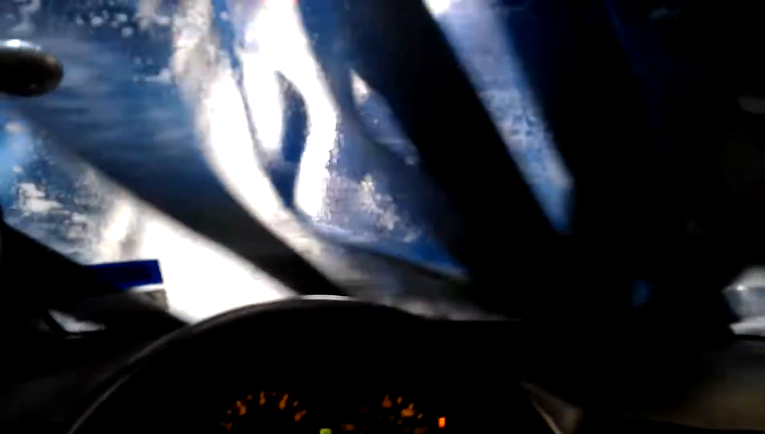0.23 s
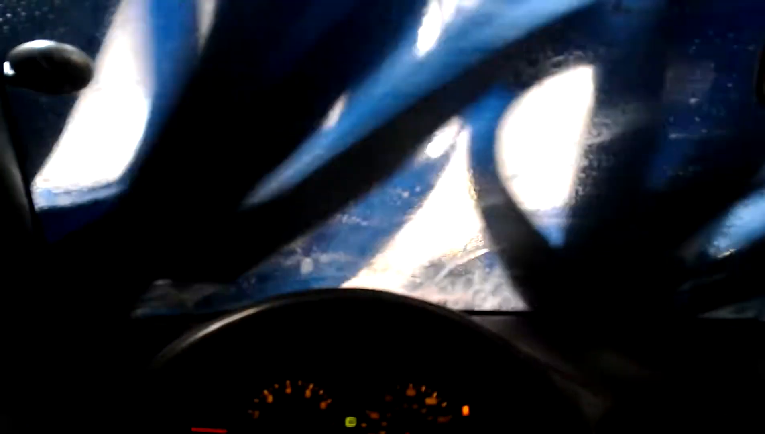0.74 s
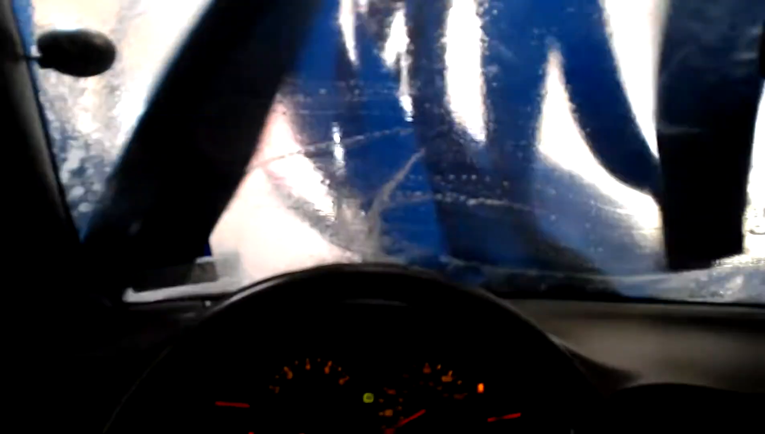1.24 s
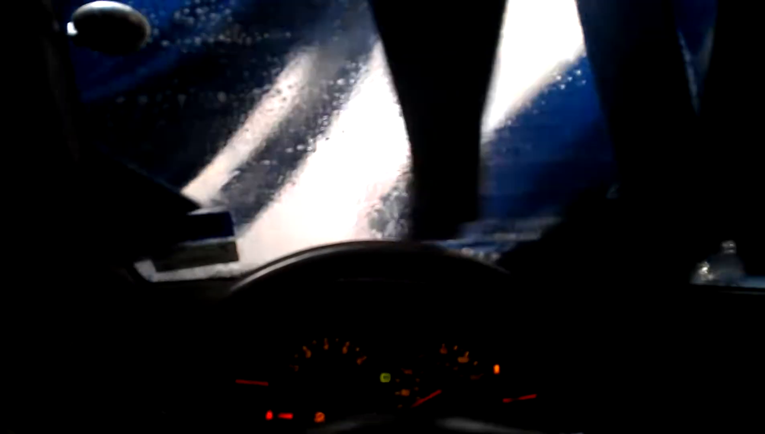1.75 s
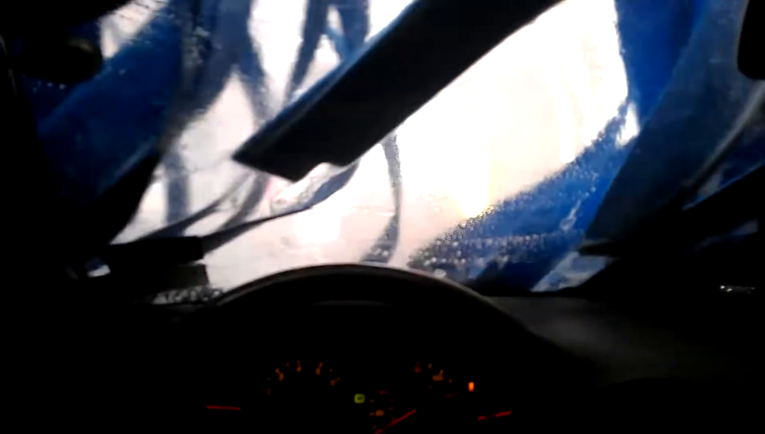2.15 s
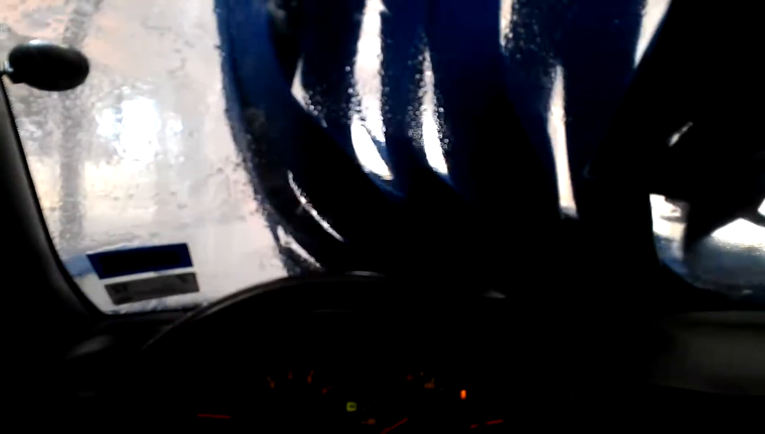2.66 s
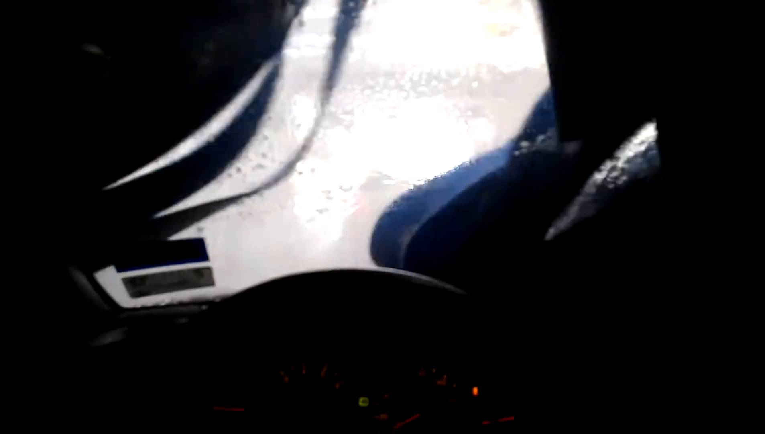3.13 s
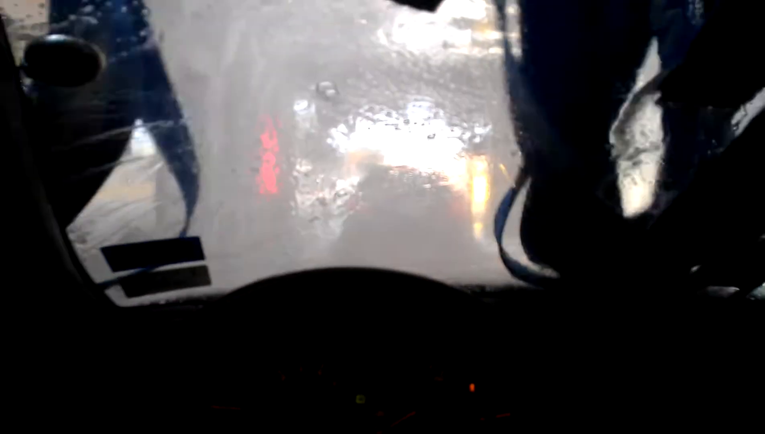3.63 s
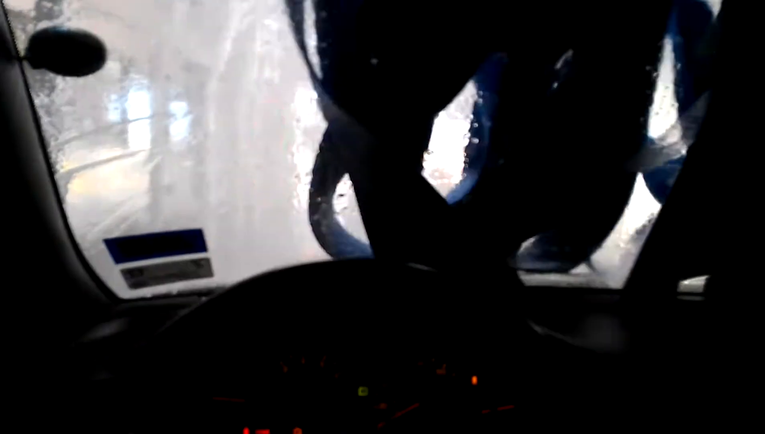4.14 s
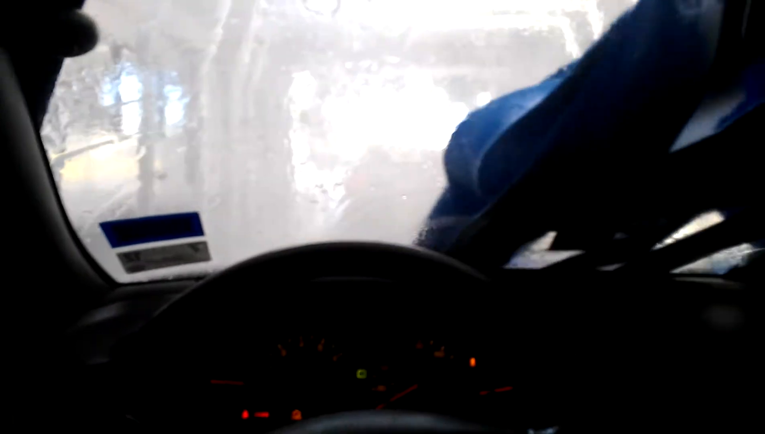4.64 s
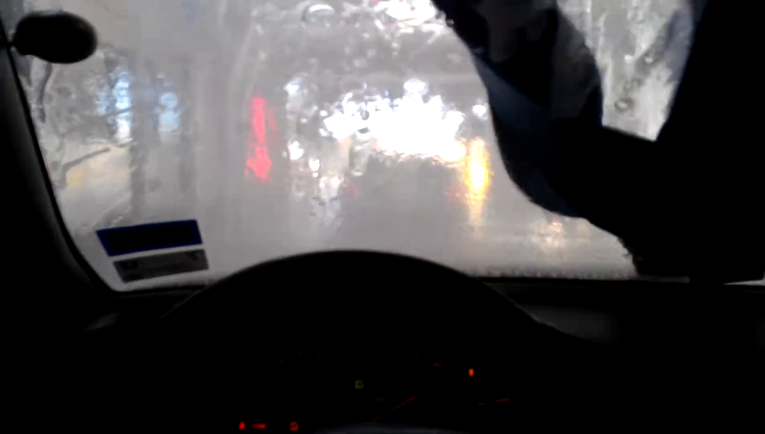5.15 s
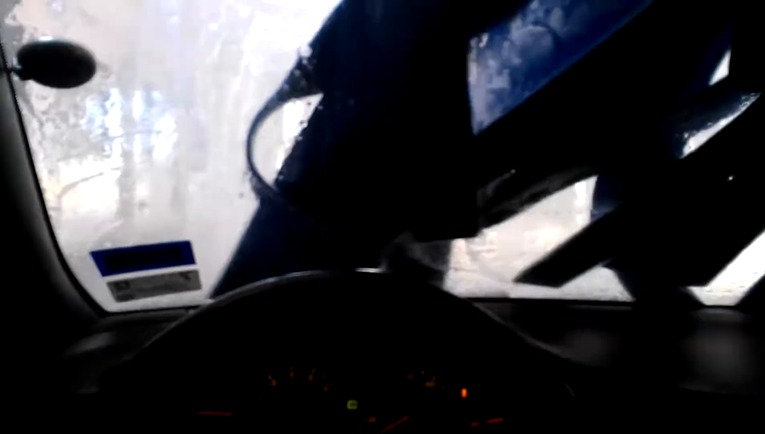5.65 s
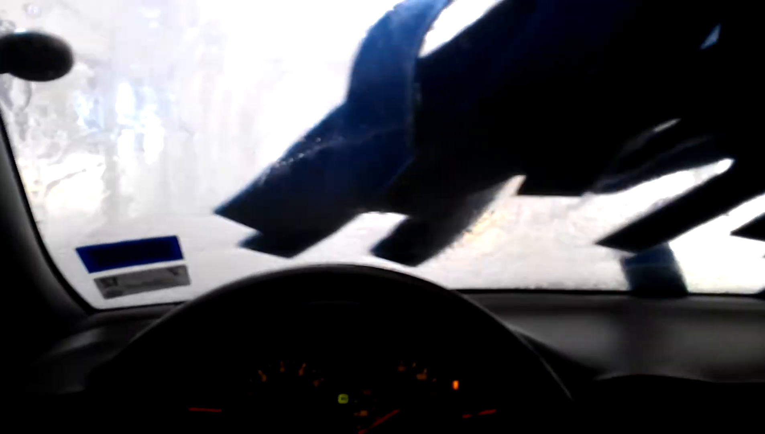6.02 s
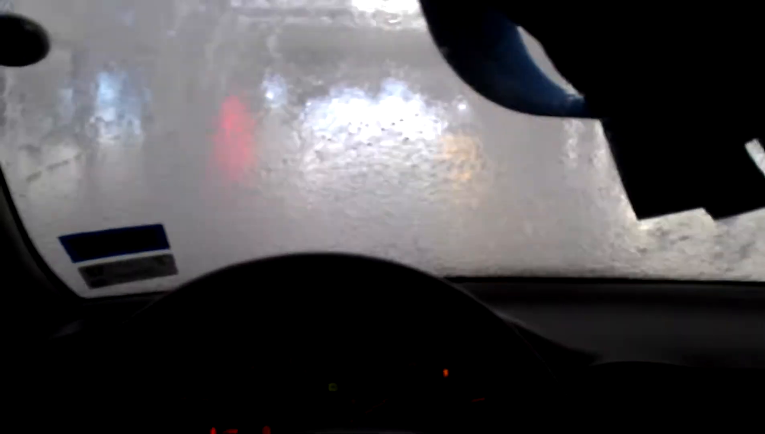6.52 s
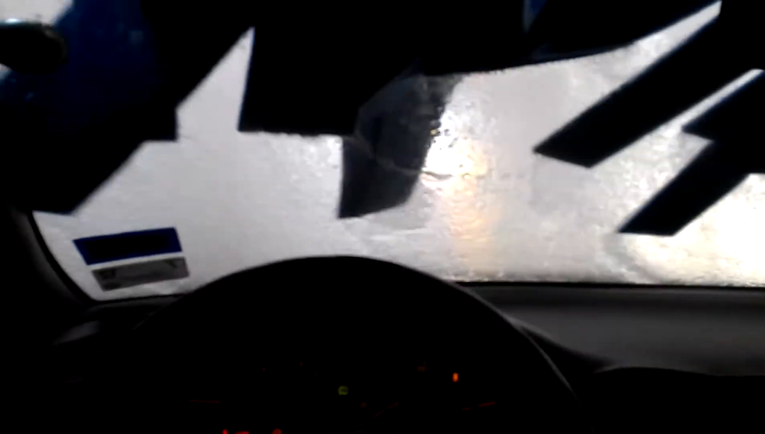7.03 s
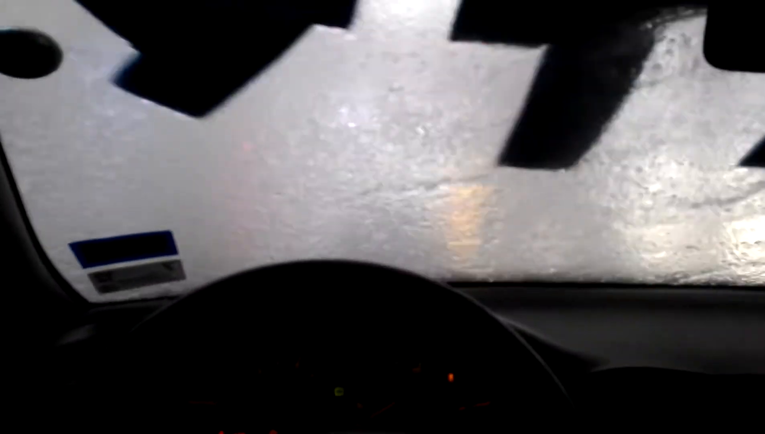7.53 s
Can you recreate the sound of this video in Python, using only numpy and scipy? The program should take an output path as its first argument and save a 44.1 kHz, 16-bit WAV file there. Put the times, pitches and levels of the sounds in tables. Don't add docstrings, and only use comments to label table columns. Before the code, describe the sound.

Inside a closed car in a tunnel wash, wet cloth drags over the panels from the start with a grainy mid-toned rub, a faint drive hum, swishing water and bright spray hiss; a thin nozzle hiss fades by about 3 s. Moderate slaps hit the glass and roof at 0.1, 0.6, 0.9 and 1.2-1.4 s. The hardest cluster lands at 1.8-2.1 s, with a sharp door whack, glass slap and deep roof thump, all splashing. Another heavy thud comes at 2.7 s, then a dull run at 3.1-3.3 s and a strong wet glass slap at 4 s. Uneven medium knocks and scrubbing continue through 4.3-5.7 s. A deep roof boom with a glass hit strikes at 6.2 s as spray grows stronger, followed by wet slaps at 6.7-7.0 and 7.4-7.7 s. Hard hits distort on the small stereo microphone, and the wash briefly ducks after them.

```python
import sys
import numpy as np
from scipy import signal
from scipy.fft import rfft, irfft, next_fast_len
from scipy.io import wavfile
from scipy.ndimage import uniform_filter1d, map_coordinates

SR = 44100
rng = np.random.default_rng(int(sys.argv[2]) if len(sys.argv) > 2 else 0)


def put_to_file(sound):
    columns = np.atleast_2d(sound).T
    safe = np.clip(columns, -1, 1)
    whole_steps = np.round(safe * 32767)
    wavfile.write(sys.argv[1], SR, whole_steps.astype(np.int16))


def makeup_ratio(level_db):
    decades = np.asarray(level_db, float) / 20
    return 10 ** decades


N = 343098


def unit(x):
    return x / np.sqrt(np.mean(x ** 2) + 1e-20)


def along(points, hz):
    f, v = np.transpose(points)
    return np.interp(np.log(hz + 1), np.log(f + 1), v)


def wobble(rate):
    knots = rng.standard_normal(int(N * rate / SR) + 4)
    return map_coordinates(knots, [np.arange(N) * rate / SR])


def filtered(x, response):
    m = next_fast_len(x.shape[-1] + 4096)
    spectrum = rfft(x, m) * response(np.fft.rfftfreq(m, 1 / SR))
    return irfft(spectrum, m)[..., :x.shape[-1]]


def resonance(f, hz, width_hz):
    return 1j * f * width_hz / (hz * hz - f * f + 1j * f * width_hz)


def hum(hz, width_hz):
    return unit(filtered(rng.standard_normal((2, N)), lambda f: resonance(f, hz, width_hz) ** 2))


def rush(spectrum, patchy_db, grain_db):
    z = signal.stft(rng.standard_normal((2, N)), nperseg=512)[2]

    def field(bins, frames):
        noise = rng.standard_normal(z.shape[1:])
        return unit(uniform_filter1d(uniform_filter1d(noise, size=bins, axis=0), size=frames, axis=1))

    aimed = 0.6
    z[1] = aimed * z[0] * np.exp(2j * field(12, 60)) + np.sqrt(1 - aimed ** 2) * z[1]
    pair = signal.istft(z * makeup_ratio(patchy_db * field(6, 8)), nperseg=512)[1][:, :N]
    return unit(filtered(pair * makeup_ratio(grain_db * wobble(250)), lambda hz: makeup_ratio(along(spectrum, hz))))


def lead_in():
    lift_s, rise_s = 0.0083, 0.075
    force = np.zeros(N)
    for s, db, *_ in blows():
        force[round((s - lift_s) * SR)] += makeup_ratio(0.67 * db - 11.5)
    rise = np.exp(-np.arange(SR // 2)[::-1] / SR / rise_s)
    return 20 * np.log10(1 + np.abs(signal.fftconvolve(force, rise)[SR // 2 - 1:][:N]))


def wash():
    # (time [s], drag level [dB], water level [dB])
    wash_moves = [(0.0, -23, -26), (0.84, -20.5, -30.5), (1.82, -22, -35), (2.01, -21, -37),
                  (2.47, -22, -37.5), (2.77, -19.5, -39.5), (3.05, -22.5, -36.5), (3.34, -20, -40),
                  (3.7, -22, -39), (4.16, -19.5, -36), (4.87, -20, -35), (5.74, -23, -34),
                  (6.09, -21, -27.5), (6.39, -19.5, -25.5), (6.72, -23, -26.5), (7.13, -21, -28),
                  (7.48, -23, -24.5), (7.78, -23, -23)]
    # (time [s], level [dB] on the swish)
    sheet_moves = [
        (0, 0),
        (1.3, -2),
        (2.2, 2),
        (4.6, 2.5),
        (5.8, 4),
        (7.78, 1.5),
    ]
    # (time [s], level [dB] against the swish)
    nozzle_moves = [
        (0, -9),
        (.65, -9),
        (1.3, -14),
        (3, -27),
    ]
    # (centre [Hz], width [Hz], level [dB] against the scrub)
    drive_hums = [
        (373, 62, -10),
        (525, 21.6, -9.5),
    ]
    # (frequency [Hz], level [dB per Hz])
    scrub_colour = [(50, -103), (100, -55.5), (257, -5), (360, 0), (524, 0), (614, -2.5), (772, 0),
                    (1040, -2.5), (1450, -23.5), (1800, -13), (2340, -36), (3960, -120)]
    # (frequency [Hz], level [dB per Hz])
    swish_colour = [(710, -37.5), (1200, -2.5), (1320, -4.5), (1760, -3.5), (2180, -1.5), (2370, -2.5),
                    (2920, -7), (3320, -7), (3850, -5.5), (5200, -16.5), (6760, -24.5), (11400, -120)]
    # (frequency [Hz], level [dB per Hz])
    spray_colour = [(2350, -65), (4000, 0.5), (5150, -4), (6130, -1.5), (7540, -5), (8950, -1.5),
                    (9360, -5), (10600, -18), (13700, -59), (22000, -120)]

    t = np.arange(N) / SR
    s, *levels = np.transpose(wash_moves)
    drag_db, water_db = [np.interp(t, s, level) for level in levels]
    sheet_db = np.interp(t, *np.transpose(sheet_moves))
    near_db = lead_in()

    swish_wet, spray_drag, lead_in_wet = 0.53, 0.06, 0.4
    scrub_db = 2.5 + drag_db + near_db
    swish_db = 5 + sheet_db + (1 - swish_wet) * drag_db + swish_wet * water_db + lead_in_wet * near_db
    spray_db = 5 + spray_drag * drag_db + water_db + lead_in_wet / 2 * near_db

    drag = wobble(22)
    drone = sum(makeup_ratio(db) * hum(hz, width_hz) for hz, width_hz, db in drive_hums)
    whistle_db = np.interp(t, *np.transpose(nozzle_moves)) + 4.3 * wobble(14)
    whistle = makeup_ratio(whistle_db) * hum(3830, 420)
    scrub = makeup_ratio(scrub_db + 1.3 * drag + 1.2 * wobble(45)) * (rush(scrub_colour, 1.2, 1.5) + drone)
    swish = makeup_ratio(swish_db + 0.28 * drag) * (rush(swish_colour, patchy_db=1.5, grain_db=0.7) + whistle)
    spray = makeup_ratio(spray_db + 1.35 * drag) * rush(spray_colour, patchy_db=1.4, grain_db=0.4)
    return scrub + swish + spray


def aimed_noise(count, size):
    shake = rng.standard_normal((count, 2, size))
    share = 0.7
    late = np.roll(shake[:, 0], rng.integers(-40, 40), axis=1)
    shake[:, 1] = share * late + np.sqrt(1 - share ** 2) * shake[:, 1]
    return shake


def contact(t, length, rise, fall):
    length = np.clip(length, .003, .08)
    release = np.exp(np.minimum((t - length) / (fall * length + 0.0011), 50))
    return (1 - np.exp(-t / rise)) / (1 + release)


def add(track, s, sound):
    start = round(s * SR)
    track[:, start:start + sound.shape[1]] += sound


def splats():
    # (time [s], peak level [dB], centre [Hz], fizz level [dB])
    big_splats = [(0.464, -7.5, 1340, -11), (.633, -7, 1270, -8), (.735, -8, 1660, -21),
                  (1.158, -14, 3860, -21), (1.782, -11, 1540, -12), (1.8088, -4.5, 1210, -17),
                  (1.8334, 5.5, 1570, -17), (1.982, -2.5, 1320, -12), (2.024, -2, 1210, -15),
                  (2.174, -11, 1320, -16), (2.4668, -13.5, 1230, -10), (2.6664, 4.5, 1800, -26),
                  (3.047, -5, 1810, -14), (3.2003, 2, 2100, -8), (3.2605, -3, 1320, -35),
                  (3.497, -7.5, 1320, -17), (3.72, -15, 2200, -17), (3.813, -11, 1700, -11),
                  (3.9818, 4, 1360, -22), (4.2684, -6, 1730, -17), (4.365, -10, 2300, -14),
                  (4.5407, -7.5, 1470, -7), (5.042, -7, 1290, -14), (5.55, -1, 1940, -28),
                  (5.695, -4, 1810, -15), (5.967, -12.5, 1310, -5), (6.22, -9, 1220, -18),
                  (6.953, -6.5, 1370, -15), (7.0284, -2, 1880, -15), (7.6987, -6.5, 2520, -2)]
    # (time [s], peak level [dB], centre [Hz])
    small_flicks = [(.578, -12.5, 1240), (1.224, -16, 1520), (1.368, -28, 1330), (1.75, -12, 1890),
                    (1.794, -17, 2300), (1.946, -6.5, 1400), (2.96, -22, 1400), (3.74, -15, 3070),
                    (3.8989, -10.5, 2620), (4.77, -14.5, 2510), (5.012, -11, 2050), (5.756, -11, 1830),
                    (6.327, -6, 2400), (6.384, -5, 1870), (6.62, -11, 2530), (6.682, -16, 1910),
                    (6.917, -8.5, 1400), (7.435, -14, 2190)]
    # (frequency [Hz], level [dB per Hz])
    wet_colour = [(900, -13), (1400, -7.5), (2000, -3), (3000, -5), (4500, -5), (7000, -42)]
    # (frequency [Hz], level [dB per Hz])
    fizz_colour = [(3000, -49), (4500, 0.5), (7000, -2.5), (9000, -1.5), (12000, -36), (16000, -41)]

    flick_fizz_db = -10
    track, t = np.zeros((2, N + SR)), np.arange(SR // 6) / SR
    for s, db, hz, fizz_db in [*big_splats, *[(*row, flick_fizz_db) for row in small_flicks]]:
        shake = aimed_noise(count=2, size=len(t))
        drops = makeup_ratio(3 * unit(uniform_filter1d(rng.standard_normal(len(t)), size=110)))
        body = unit(filtered(drops * shake[0],
                             lambda f: makeup_ratio(along(wet_colour, f)) * resonance(f, hz, 0.32 * hz)))
        fizz = unit(filtered(drops * shake[1], lambda f: makeup_ratio(along(fizz_colour, f))))
        burst = contact(t, 0.016, 0.00037, 0.35)
        trickle = makeup_ratio(-9 - 60 * t / 0.18) * (1 - np.exp(-t / 0.002))
        add(track, s, makeup_ratio(db - 4.5) * ((burst + trickle) * body + makeup_ratio(fizz_db) * burst * fizz))
    return track[:, :N]


def blows():
    # (time [s], peak level [dB], contact [ms])
    boom_blows = [
        (3.19, -7, 12),
        (6.222, 6, 21),
    ]
    # (time [s], peak level [dB], contact [ms])
    roof_blows = [(.463, -12, 8.8), (.863, -24, 49), (.892, -1.5, 13), (1.134, -10, 11), (1.57, -23, 11),
                  (1.665, -8, 24), (1.979, -1, 36), (2.029, 11.5, 16.3), (2.243, -5.5, 13), (2.46, 1, 18),
                  (2.499, 4, 30), (2.67, 12, 9.2), (3.144, -7.5, 10), (3.186, 6.5, 30), (3.21, 1.5, 36),
                  (3.267, 6.5, 6.3), (3.473, -10, 19), (3.726, -1, 26), (3.816, 0.5, 21), (4.55, 1.5, 27.7),
                  (4.755, -3, 20), (4.793, -2, 15), (4.957, -0.5, 12), (5.637, -17.5, 30), (6.162, -1, 16),
                  (3.915, -1.5, 7.3), (6.326, 1, 20), (6.501, -3, 8.7), (6.892, -9, 9.9), (7.431, -3, 13)]
    # (time [s], peak level [dB], contact [ms])
    door_blows = [(.578, -6, 7.7), (1.157, -3, 12), (1.471, -12.5, 85), (1.786, 0.5, 6.1), (1.809, 18, 3.4),
                  (2.171, 4, 27), (2.37, -24, 17), (2.427, -7.5, 63), (2.803, -6.5, 35), (3.402, -26, 110),
                  (3.644, -4, 6.2), (5.116, -6.5, 23), (4.161, -13, 14), (4.266, 4.5, 22), (4.28, 3.5, 21),
                  (4.426, -19, 22), (4.854, -11, 21), (5.339, 2.5, 26), (5.549, 1.5, 8.3),
                  (5.966, -4.5, 45), (6.234, -11, 27), (6.777, -19, 32), (6.845, -17, 26), (6.935, 7, 6.7),
                  (7.459, -6, 11), (7.574, -4, 21), (7.613, -6.5, 18), (7.693, 6, 22)]
    # (time [s], peak level [dB], contact [ms])
    glass_blows = [(.106, 0, 15), (.152, -12, 21), (.42, -8, 35), (.632, 5.5, 4.6), (.664, -2, 12),
                   (1.047, -13.5, 100), (1.22, 4.5, 11), (1.28, -9, 41), (1.363, 5.5, 5.1),
                   (1.836, 12.5, 6.6), (1.929, -3.5, 87), (1.958, 3, 68), (2.097, 4.5, 5.6),
                   (2.689, 4.5, 11), (2.958, 2.9, 16), (3.047, -3.3, 16), (3.494, -1, 22.4), (3.98, 9, 9.1),
                   (3.999, 1, 24), (4.365, 0.5, 8), (5.296, -35, 12), (5.679, -0.9, 37), (6.095, -12, 26),
                   (6.216, 10, 20), (6.712, 4, 11.3), (7.027, 5, 10.3), (7.552, 4.5, 12.6)]
    # (time [s], peak level [dB], contact [ms])
    pillar_blows = [
        (.044, -7.5, 8),
        (3.777, -2.5, 8.5),
        (5.029, -6, 21),
        (5.274, -0.3, 13.7),
        (5.605, -15, 54),
        (6.382, -1.5, 27),
        (6.914, -3, 79),
        (6.95, -2, 4.3),
    ]
    parts = [(boom_blows, 264), (roof_blows, 367.6), (door_blows, 529.8), (glass_blows, 763),
             (pillar_blows, 931)]
    return [(s, db, hz, ms / 1000) for rows, hz in parts for s, db, ms in rows]


def cabin(f):
    # (centre [Hz], width [Hz], level [dB])
    cabin_modes = [
        (352.7, 16.3, 1),
        (557, 70, 2),
        (621, 414, 0),
        (780, 320, 1.5),
        (1070, 111, -6),
        (1320, 125, -10.5),
    ]
    return sum((-1) ** k * makeup_ratio(db) * resonance(f, hz, width_hz)
               for k, (hz, width_hz, db) in enumerate(cabin_modes))


def thumps():
    spot_spread, ragged_db = 0.04, 1.5
    track, t = np.zeros((2, N + SR)), np.arange(SR // 6) / SR
    for s, db, hz, length in blows():
        shake = aimed_noise(count=2, size=len(t))
        hz = hz * (1 + spot_spread * rng.standard_normal())
        drift = .75 * np.sqrt(hz / 400) * unit(uniform_filter1d(shake[0], size=300))
        sag = 1 + 0.16 * np.exp(-t / 0.0059)
        phase = 2 * np.pi * hz * np.cumsum(sag) / SR + drift - drift[0, 0]
        panel = np.sqrt(2) * np.sin(phase)
        shell = unit(filtered(shake[1], lambda f: cabin(f) * resonance(f, hz, 1.7 * hz)))
        tail = makeup_ratio(-3 - 60 * t / 0.17) * (1 - np.exp(-t / 0.001))
        blow = contact(t, length, 0.96 / hz, 0.42)
        blow = blow * makeup_ratio(ragged_db * unit(uniform_filter1d(rng.standard_normal(len(t)), size=160)))
        add(track, s, makeup_ratio(db - 6.5) * makeup_ratio(-0.5) * (blow * panel + (blow + tail) * shell))
    return track[:, :N]


def ports(pair):
    # (frequency [Hz], left-right likeness [0-1])
    port_likeness = [(60, 0.11), (120, 0.78), (260, 0.88), (540, 0.7), (1120, 0.33), (2340, 0.069),
                     (4860, 0.45), (10100, 0.065)]
    # (frequency [Hz], left over right [dB])
    port_lean = [(110, 5), (300, 4), (700, 6), (1800, 2.5), (3300, 7), (10000, 5)]

    def turned(hz):
        angle = np.arccos(np.clip(along(port_likeness, hz), 0, 1)) / 2
        return np.array([np.cos(angle), np.sin(angle)])

    mid, side = filtered(pair, turned)
    return filtered(np.array([mid + side, mid - side]),
                    lambda hz: makeup_ratio(np.outer([.5, -.5], along(port_lean, hz))))


def scene():
    panels = signal.butter(5, 231, "high", fs=SR, output="sos")
    return ports(signal.sosfilt(panels, thumps() + splats()) + wash())


def ducking(dry):
    lag_s, knee_db, ratio = 0.071, -10, 1.113
    bass_hz, bass_db = 340, 2
    u = np.arange(SR // 2) / SR / lag_s
    felt = filtered(dry, lambda f: 1 + makeup_ratio(bass_db) / (1 + (f / bass_hz) ** 6))
    lag = (u * np.exp(1 - u)) ** 3
    power = np.abs(signal.fftconvolve(np.mean(felt ** 2, axis=0), lag / lag.sum())[:N])
    return (1 + power / makeup_ratio(2 * knee_db)) ** (-ratio / 2)


def flickering_treble(x, top_hz):
    # (frequency [Hz], share of frames [0-1])
    treble_share = [
        (9650, .68),
        (10340, .17),
        (12500, .07),
    ]
    band_hz = 690
    hz, _, z = signal.stft(x, SR, nperseg=2048)
    for low in np.arange(9650, top_hz, band_hz):
        band = (hz >= low) & (hz < low + band_hz)
        loudness = np.log(np.sum(np.abs(z[:, band]) ** 2, axis=(0, 1)) + 1e-20)
        loudness = loudness + rng.normal(0, .3, z.shape[2])
        z[:, band] *= loudness > np.quantile(loudness, 1 - along(treble_share, low))
    return signal.istft(z, SR, nperseg=2048)[1][:, :N]


def roll_off(x):
    return signal.sosfilt(signal.butter(12, 15700, fs=SR, output="sos"), x)


def record(dry):
    top_hz, rumble_cut_hz = 15700, 55
    x = dry * ducking(dry)
    ceiling = np.where(x > 0, .97, 1)
    x = x / (1 + np.abs(x / ceiling) ** 14) ** (1 / 14)
    x = filtered(x, lambda f: (f < top_hz) / np.sqrt(1 + (rumble_cut_hz / (f + 1)) ** 6))
    mix = flickering_treble(x, top_hz)
    return roll_off(mix)


dry = scene()
out = record(dry)
put_to_file(out)
```